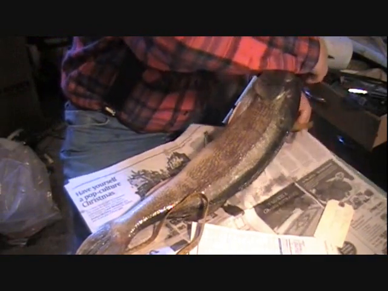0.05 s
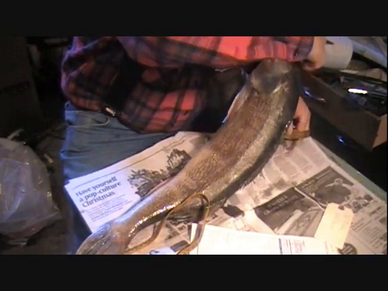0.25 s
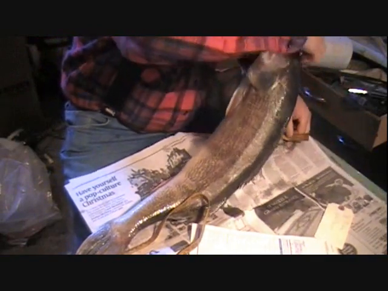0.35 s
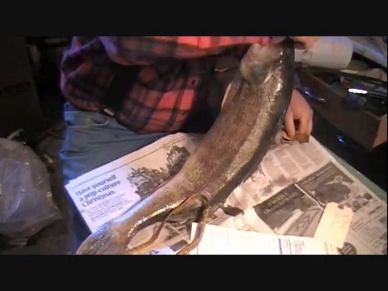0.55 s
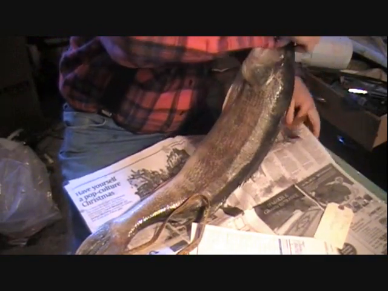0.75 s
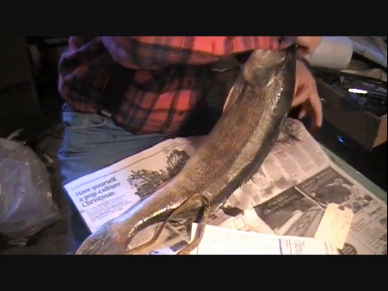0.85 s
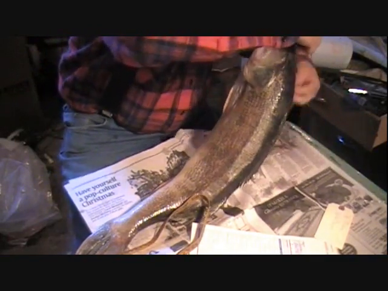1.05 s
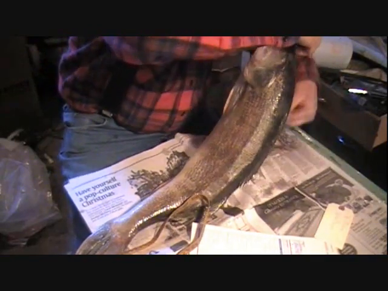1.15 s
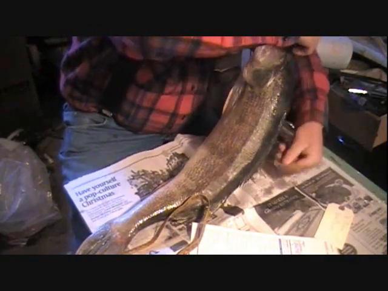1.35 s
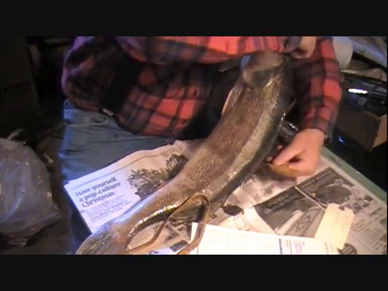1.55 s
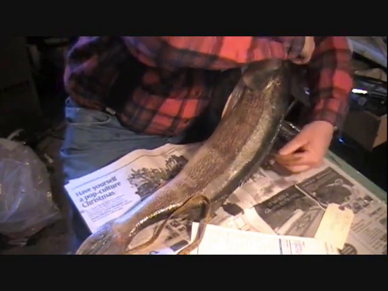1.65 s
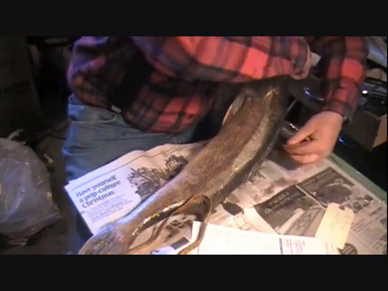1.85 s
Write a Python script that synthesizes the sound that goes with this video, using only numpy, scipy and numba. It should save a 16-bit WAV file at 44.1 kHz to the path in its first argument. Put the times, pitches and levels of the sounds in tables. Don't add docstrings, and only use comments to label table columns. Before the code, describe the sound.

Newspaper rustles and pops on a work table as a fish is moved, loudest in the first half second, then lighter crackles and soft knocks; close stereo microphone, short room response, faint background hum.

```python
import sys
import numpy as np
from scipy import signal
from scipy.fft import rfft, irfft
from scipy.io import wavfile
from scipy.ndimage import uniform_filter1d
from numba import njit

SR = 44100
rng = np.random.default_rng(int(sys.argv[2]) if len(sys.argv) > 2 else 0)


def gain_from_decibels(decibels):
    exponent = np.asarray(decibels, float) / 20
    return 10 ** exponent


def log_audio(samples):
    frames = np.atleast_2d(samples).T
    limited = np.clip(frames, -1, 1)
    pcm = np.round(limited * 32767).astype(np.int16)
    wavfile.write(sys.argv[1], SR, pcm)


N = 83790

# (frequency [Hz], density [dB per Hz])
SHED_SPECTRUM = [(18, -70), (30, -29), (184, -1.5), (600, 2), (1070, 0), (3870, -2.5), (4420, -13.5),
                 (8300, -17), (16000, -22)]
# (time [s], level [dB], brightness of fine grains [dB])
SLIDE_EFFORT = [(0, -39, -9), (.15, -49.5, 0.5), (.3, -45.5, -5.5), (.38, -56, 4.5), (.44, -45, 2.5),
                (.495, -45.5, -1), (.525, -39, 9), (.58, -46, 3.5), (.65, -67, 12.5), (.8, -53, 1.5),
                (.925, -42, -0.5), (1.04, -43.5, -1), (1.065, -56, 0), (1.27, -44.5, -2.5),
                (1.39, -41.5, 3.5), (1.44, -53, 1), (1.68, -45, -2.5), (1.9, -50.5, -3.5)]
# (frequency [Hz], density [dB per Hz])
PAPER_SPECTRUM = [(120, -51), (200, -9), (350, -21.5), (761, 1.5), (980, -5), (1540, -2.5), (4010, -6.5),
                  (7280, -1.5), (15000, -30.5)]
# (time [s], pop [dB], crack [dB], tick [dB])
LIFT_BUCKLES = [(0.0496, -35.5, -46, -59), (0.0987, -47.5, -36, -44), (0.1209, -43, -40.5, -40),
                (0.1481, -46, -39.5, -43), (0.162, -29, -44, -45), (0.182, -27, -36, -44),
                (0.1986, -29, -35, -32), (0.2161, -31, -35, -45), (0.2282, -22.5, -24.5, -24),
                (0.267, -35, -43, -43), (0.278, -20, -24, -18.5), (0.2938, -47, -53, -46),
                (0.3161, -33.5, -32, -32.5), (0.3249, -51, -45, -32), (0.3415, -32.5, -38, -47),
                (0.3514, -31.5, -42, -51), (0.4399, -29.5, -28.5, -35), (0.4428, -29, -22.5, -30),
                (0.4466, -22.5, -47, -33), (0.4642, -41, -36, -38), (0.4912, -49, -33.5, -47),
                (0.5983, -27, -29, -38), (0.6162, -51, -52, -33), (0.6581, -41.5, -56, -58),
                (0.6877, -43, -44, -51)]
# (time [s], pop [dB], crack [dB], tick [dB])
CRUMPLE_BUCKLES = [(0.5023, -37, -32.5, -24), (0.505, -45, -33, -28.5), (0.5125, -49, -31, -22),
                   (0.5153, -30, -22.5, -18.5), (0.5184, -34, -21.5, -23.5), (0.5209, -41, -25, -21.5),
                   (0.5217, -49, -25, -30), (0.5269, -26.5, -28.5, -18), (0.5297, -41, -22.5, -23),
                   (0.5334, -33, -29, -31), (0.5396, -45, -25, -22.5), (0.5467, -33, -45, -26),
                   (0.5531, -41.5, -24.5, -20), (0.5557, -42, -32, -20)]
# (time [s], pop [dB], crack [dB], tick [dB])
SHIFT_BUCKLES = [(0.8446, -53, -45, -48), (0.9013, -64, -50, -34), (0.918, -32, -60, -44),
                 (0.9238, -31, -46, -31), (0.9334, -37, -38, -38), (0.9596, -56, -46, -49),
                 (0.984, -36, -48, -51), (1.0178, -34, -48, -49), (1.0348, -36, -39.5, -42),
                 (1.0423, -46, -46, -48), (1.1362, -49, -50, -58), (1.1971, -32.5, -32, -33.5),
                 (1.2009, -31, -37, -50), (1.2355, -43, -47, -54), (1.2464, -28, -43, -47),
                 (1.2782, -37.5, -49, -51), (1.293, -39.5, -37, -44), (1.3101, -29.5, -33.5, -33),
                 (1.3325, -26.5, -33.5, -31), (1.347, -37.5, -47, -32.5), (1.3686, -38, -45, -39),
                 (1.3825, -28.5, -32.5, -42), (1.3893, -33, -36, -44)]
# (time [s], pop [dB], crack [dB], tick [dB])
SETTLE_BUCKLES = [(1.5034, -36.5, -55, -54), (1.5158, -57, -60, -62), (1.5321, -39, -25.5, -22),
                  (1.6183, -44, -40, -30.5), (1.6252, -37, -38, -38), (1.646, -33, -31, -27.5),
                  (1.6678, -29.5, -39, -39), (1.6905, -35, -51, -49), (1.7019, -36, -40, -52),
                  (1.7119, -31, -36, -35), (1.7226, -33.5, -45, -52), (1.7505, -49, -40, -58),
                  (1.7546, -43, -40, -45), (1.793, -56, -43, -63), (1.812, -33, -37, -51),
                  (1.8195, -32, -32.5, -49), (1.8512, -51, -45, -46), (1.8688, -38, -37, -37),
                  (1.8794, -33.5, -33, -37)]
# (time [s], pop [dB], crack [dB], tick [dB])
MORE_BUCKLES = [
    (0.41, -44.5, -45.5, -50),
    (0.49, -46.5, -38, -44),
    (1.5331, -46, -31, -27),
]
# (lowest [Hz], highest [Hz], length [cycles], spread [s])
THUMP_RINGS = (400, 1150, 2, .0005)
# (lowest [Hz], highest [Hz], length [cycles], spread [s])
POP_RINGS = (1150, 2300, 6, .0003)
# (lowest [Hz], highest [Hz], length [cycles], spread [s])
CRACK_RINGS = (2250, 5400, 7, .0003)
# (lowest [Hz], highest [Hz], length [cycles], spread [s])
TICK_RINGS = (5300, 9000, 10, .00025)
# (lowest [Hz], highest [Hz], length [cycles], spread [s])
FIZZ_RINGS = (8900, 13200, 9, .00025)
# (time [s], level [dB])
TABLE_KNOCKS = [(.052, -33), (.278, -44), (.3161, -32), (.4428, -34), (.4466, -24), (.984, -35),
                (1.0419, -38), (1.1356, -32.5), (1.1977, -32), (1.2465, -28.5), (1.293, -39), (1.3105, -34),
                (1.5158, -37), (1.6254, -33), (1.7124, -36)]
# (time [s], pitch [Hz], level [dB])
PANEL_NOTES = [(0.0984, 1240, -40), (0.098, 2920, -47), (0.1216, 2550, -39), (0.12, 5400, -43),
               (0.181, 6730, -38), (0.1984, 2780, -33.5), (0.1986, 6530, -33), (0.2275, 1310, -31.5),
               (0.267, 6950, -30.5), (0.267, 1590, -40), (0.278, 1783, -20.5), (0.278, 6400, -25),
               (0.3158, 1570, -39.5), (0.3161, 3060, -36.5), (0.343, 1160, -39), (0.4428, 6660, -25),
               (0.4428, 1800, -30), (0.4467, 1090, -31.5), (0.4466, 6700, -36), (0.5153, 8300, -20),
               (0.5145, 5220, -21), (0.53, 3830, -23), (0.5301, 9300, -16), (0.5473, 6700, -44),
               (0.5557, 6700, -46), (0.5557, 8100, -37), (0.5983, 1680, -35), (0.5983, 6660, -38),
               (0.9234, 3300, -34.5), (0.984, 3060, -36), (0.984, 740, -34), (1.1971, 3300, -38),
               (1.1979, 6640, -32), (1.2465, 500, -37.5), (1.2466, 1320, -42), (1.3105, 860, -37.5),
               (1.3339, 7200, -36.5), (1.39, 7400, -37), (1.5056, 1140, -44), (1.503, 5600, -50),
               (1.5321, 5280, -29), (1.5322, 4230, -27.5), (1.626, 1550, -38.5), (1.6254, 3470, -39.5),
               (1.646, 6200, -28.5), (1.646, 3530, -28), (1.6679, 1760, -50), (1.668, 4010, -41),
               (1.6905, 1720, -43), (1.69, 5400, -53), (1.7118, 4100, -41), (1.7124, 3100, -40),
               (1.7541, 1490, -39.5), (1.7548, 3650, -37), (1.8692, 2020, -46), (1.8675, 3350, -41)]
# (time [s], level [dB])
FIBRE_SNAPS = [(.1209, -30), (.4428, -34), (.5151, -29), (.5205, -22), (.5273, -23), (.5344, -28),
               (.5532, -26), (.9231, -38), (1.4605, -38), (1.5321, -22)]
# (time [s], level [dB])
WHIP_SNAP = [
    (.278, -5),
]

RISE_CYCLES = .8
SHED_DB, SHED_WIDE_HZ, SHED_SIDE_DB, SHED_BASS_SIDE = -56, 430, -4, .55
GRAINS_PER_S, GRAIN_CYCLES, GRAIN_SCATTER_DB, FLUTTER_DB = 40000, 5.24, 2, 1.7
THUMP_DB, POP_DB, CRACK_DB, TICK_DB, FIZZ_DB = -9, -4, -3, -4.5, -19
BUCKLE_S, BUCKLE_TOP_HZ = .0018, 12400
SMEAR_DB, SMEAR_MOST, SOFT_SMEAR = -44, 4, 1.2
HARD_DB, FIZZ_GROWTH_DB_PER_DB = -28, .6
KNOCK_HZ, KNOCK_CYCLES = 544, 3.2
ROOM_T60_S, ROOM_GAP_S, ROOM_DB, ROOM_SIDE_DB = 0.12, 0.00124, -7, -11
ROOM_LOW_HZ, ROOM_TOP_HZ, ROOM_SIDE_LIFT_HZ = 570, 11000, 5700
NOTE_DB, NOTE_LATE_S, NOTE_T60_S = 11.5, -0.00017, .0048
NEIGHBOUR_LATE_S, NEIGHBOUR_DETUNE, NEIGHBOUR_GAIN = 0.000477, 0.068, 0.58
SNAP_HZ, SNAP_CYCLES = 9400, 2.4
RUB_S, RUB_LENGTH_S, RUB_HZ, RUB_CYCLES, RUB_DB = 1.048, .072, 900, 16, -54
LOW_CUT_HZ, MIC_TOP_HZ, HISS_TOP_HZ, TOP_HZ = 186, 12700, 15850, 16900
PORT_HZ, PORT_WIDTH_HZ, PORT_DB, PORT_LAG_S = 9100, 850, -0.5, .00003


def curve(table, x, col=1, log=False):
    a = np.array(table, float)
    if log:
        return np.interp(np.log(x), np.log(a[:, 0]), a[:, col])
    return np.interp(x, a[:, 0], a[:, col])


def level(x, db):
    return x * gain_from_decibels(db) / np.sqrt(np.mean(x ** 2))


def butter(x, order, hz, kind="low"):
    return signal.sosfilt(signal.butter(order, hz, kind, fs=SR, output="sos"), x)


def steep_top(x, hz):
    return signal.sosfilt(signal.ellip(8, .2, 50, hz, fs=SR, output="sos"), x)


def walk(rate_hz):
    k = int(SR / rate_hz)
    return uniform_filter1d(np.repeat(rng.standard_normal(N // k + 1), k), k)[:N]


@njit
def rings(n, at, turn, fade, rise, size):
    out = np.zeros(n)
    for g in range(len(at)):
        i = int(at[g]) + 1
        p = np.exp(1j * turn[g] - fade[g])
        q = np.exp(-rise[g])
        z = size[g] * np.exp((1j * turn[g] - fade[g]) * (i - at[g]))
        r = np.exp(-rise[g] * (i - at[g]))
        for j in range(max(i, 0), min(n, i + int(6 / fade[g]))):
            out[j] += z.imag * (1 - r)
            z *= p
            r *= q
    return out


def ring(s, hz, cycles, size):
    hz = np.clip(hz, 50, .45 * SR)
    fade = np.log(1000) * hz / (2 * np.maximum(cycles, .5) * SR)
    return rings(N, s * SR, 2 * np.pi * hz / SR, fade, hz / RISE_CYCLES / SR, size)


def taps(table, hz, cycles):
    s, db = np.array(table, float).T
    return ring(s, hz * (1 + 0.18 * rng.standard_normal(len(s))), cycles + 0 * s, -gain_from_decibels(db))


def shed():
    hz = np.fft.rfftfreq(N, 1 / SR) + 1
    spectrum = gain_from_decibels(curve(SHED_SPECTRUM, hz, log=True))
    side_gain = gain_from_decibels(SHED_SIDE_DB) + SHED_BASS_SIDE / (1 + (hz / SHED_WIDE_HZ) ** 2)
    mid = irfft(rfft(rng.standard_normal(N)) * spectrum, N)
    side = irfft(rfft(rng.standard_normal(N)) * spectrum * side_gain, N)
    return level(np.array([mid + side, mid - side]), SHED_DB)


def rustle():
    u = rng.random((int(GRAINS_PER_S * N / SR), 5)).T
    s, hz = u[0] * N / SR, 220 * 65 ** u[1]
    fine = np.clip(np.log2(hz / 2400) + .5, 0, 1)
    i = (s * SR).astype(int)
    flutter = (1 - fine) * walk(70)[i] + fine * walk(90)[i] + walk(130)[i]
    db = curve(PAPER_SPECTRUM, hz, log=True) + 20 * np.log10(hz / 2400)
    db = db - GRAIN_SCATTER_DB * np.log(1 - u[2]) + FLUTTER_DB * flutter
    cycles, sign = GRAIN_CYCLES * (.5 + u[3]), np.sign(u[4] - .5)
    steady_rms = np.std(ring(s, hz, cycles, sign * gain_from_decibels(db)))
    effort_db = curve(SLIDE_EFFORT, s) + fine * curve(SLIDE_EFFORT, s, col=2)
    return ring(s, hz, cycles, sign * gain_from_decibels(db + effort_db)) / steady_rms


def buckles(count=14):
    rows = np.vstack([LIFT_BUCKLES, CRUMPLE_BUCKLES, SHIFT_BUCKLES, SETTLE_BUCKLES, MORE_BUCKLES]).astype(float)
    start_s = rows[:, :1]
    smear = np.minimum(1 + gain_from_decibels(2 * (curve(SLIDE_EFFORT, start_s) - SMEAR_DB)), SMEAR_MOST)
    fizz_db = FIZZ_DB + FIZZ_GROWTH_DB_PER_DB * (rows[:, 3:] - HARD_DB) + 10 * np.log10(smear)
    softness = np.clip((HARD_DB - rows[:, 1:].max(axis=1, keepdims=True)) / 10, 0, 1)
    smear = smear + SOFT_SMEAR * softness
    parts = ((1, THUMP_RINGS, THUMP_DB), (1, POP_RINGS, POP_DB), (2, CRACK_RINGS, CRACK_DB),
             (3, TICK_RINGS, TICK_DB), (3, FIZZ_RINGS, fizz_db))
    out = 0
    for col, (lo_hz, hi_hz, cycles, spread_s), part_db in parts:
        u = rng.random((len(rows), 4, count))
        hz = lo_hz * (hi_hz / lo_hz) ** ((np.arange(count) + u[:, 0]) / count)
        late = -np.log(1 - u[:, 1])
        cycles = cycles * (.6 + .8 * u[:, 2])
        size = np.sign(u[:, 3] - .5) * np.exp(-late / 2) * hz
        fade, rise = np.log(1000) / cycles, 1 / RISE_CYCLES
        energy = size ** 2 * (1 / fade - 2 / (fade + rise) + 1 / (fade + 2 * rise)) / hz
        gain = np.sqrt(BUCKLE_S * np.sqrt(smear) / energy.sum(axis=1, keepdims=True))
        size = size * gain_from_decibels(rows[:, col:col + 1] + part_db) * gain
        s = start_s + (late * smear - (smear - 1) / 2) * spread_s
        out = out + ring(s.ravel(), hz.ravel(), cycles.ravel(), size.ravel())
    return out


def room(x):
    t = np.arange(SR // 2) / SR
    tail = rng.standard_normal((2, len(t))) * gain_from_decibels(-60 * t / ROOM_T60_S) * (t > ROOM_GAP_S)
    mid, side = level(tail, 0) / np.sqrt(len(t))
    side = side + 2 * butter(side, 2, ROOM_SIDE_LIFT_HZ, "high")
    dull = butter(x, 1, (ROOM_LOW_HZ, ROOM_TOP_HZ), "band")
    mid = signal.fftconvolve(dull, mid)[:N] * gain_from_decibels(ROOM_DB)
    side = signal.fftconvolve(dull, side)[:N] * gain_from_decibels(ROOM_DB + ROOM_SIDE_DB)
    return np.array([mid + side, mid - side])


def knocks():
    return taps(TABLE_KNOCKS, KNOCK_HZ, KNOCK_CYCLES)


def notes():
    s, hz, db = np.array(PANEL_NOTES, float).T
    u = rng.standard_normal((len(s), 2)).T
    size = gain_from_decibels(db + NOTE_DB) * np.sign(u[0])
    cycles = NOTE_T60_S * np.sqrt(4000 * hz) / 2
    panel = ring(s + NOTE_LATE_S, hz, cycles, size)
    neighbour_hz = hz * (1 + NEIGHBOUR_DETUNE * u[1])
    return panel + ring(s + NEIGHBOUR_LATE_S, neighbour_hz, cycles, NEIGHBOUR_GAIN * size)


def snaps():
    return taps(FIBRE_SNAPS, SNAP_HZ, SNAP_CYCLES)


def whip():
    return taps(WHIP_SNAP, SNAP_HZ, SNAP_CYCLES)


def rub(count=160):
    u = rng.random((count, 3)).T
    s = (np.arange(count) + u[0]) / count
    hz = RUB_HZ * (1 + .03 * np.sin(9 * s) + .08 * (u[1] - .5))
    return ring(RUB_S + RUB_LENGTH_S * s, hz, RUB_CYCLES + 0 * s, gain_from_decibels(RUB_DB) * np.sign(u[2] - .5))


def scene():
    hits = buckles() + knocks() + notes()
    paper = butter(hits, 4, BUCKLE_TOP_HZ) + rustle() + rub()
    paper = butter(paper, 2, LOW_CUT_HZ, "high")
    paper = butter(paper, 3, MIC_TOP_HZ)
    direct = paper + snaps()
    soft = steep_top(direct + room(direct) + shed(), HISS_TOP_HZ)
    return soft + whip()


def roll_off(x):
    return signal.sosfilt(signal.butter(12, 17150, fs=SR, output="sos"), x)


def record(dry):
    hz = np.fft.rfftfreq(N, 1 / SR) + 1
    resonance = gain_from_decibels(PORT_DB) / (1 + ((hz - PORT_HZ) / (PORT_WIDTH_HZ / 2)) ** 2)
    lag = np.exp(-2j * np.pi * hz * PORT_LAG_S)
    side = irfft(rfft(dry.mean(axis=0)) * resonance * lag, N)
    mix = steep_top(dry + np.array([side, -side]), TOP_HZ)
    return roll_off(mix)


dry = scene()
out = record(dry)
log_audio(out)
```